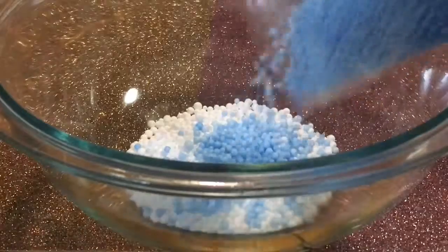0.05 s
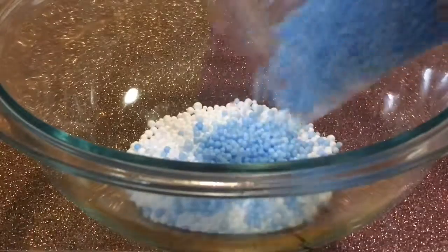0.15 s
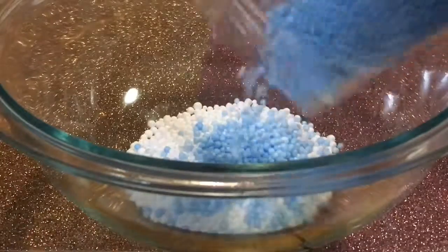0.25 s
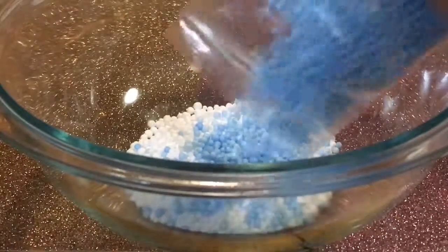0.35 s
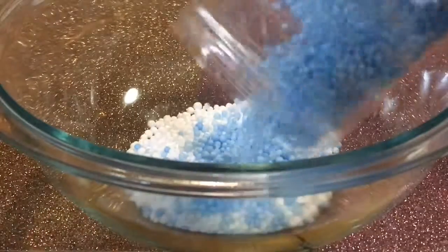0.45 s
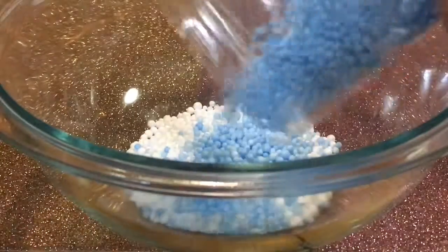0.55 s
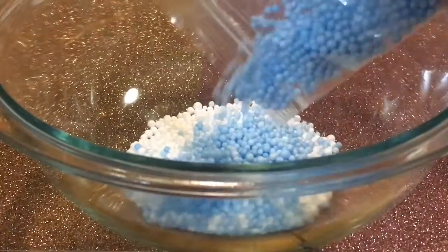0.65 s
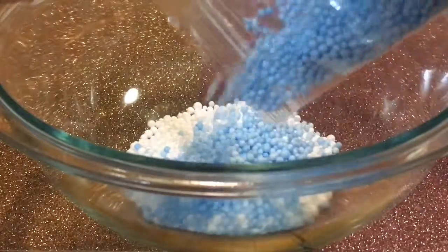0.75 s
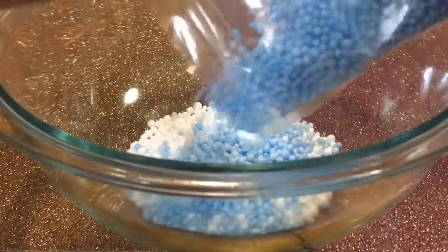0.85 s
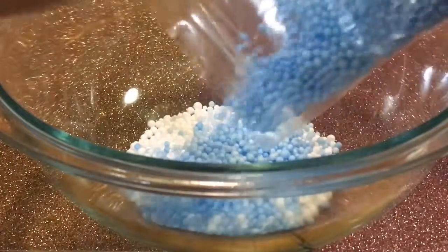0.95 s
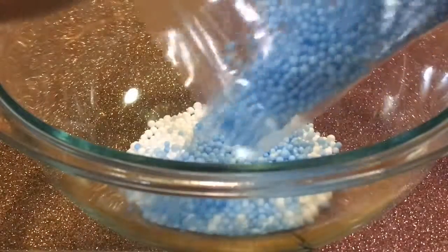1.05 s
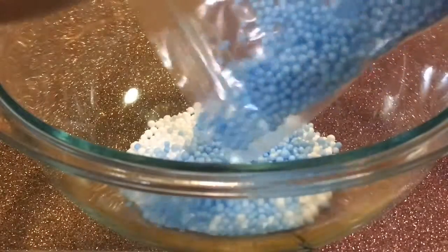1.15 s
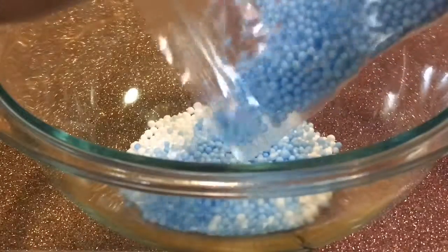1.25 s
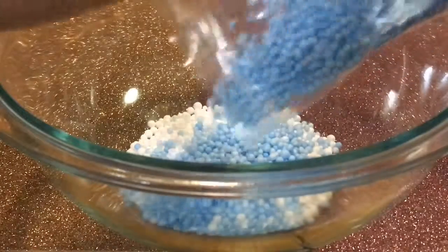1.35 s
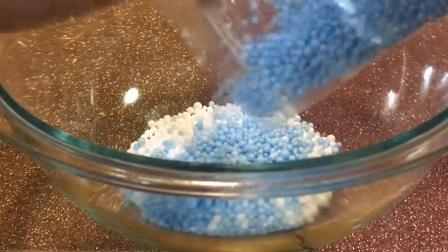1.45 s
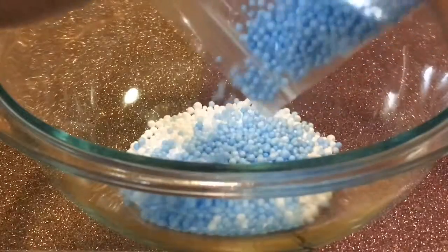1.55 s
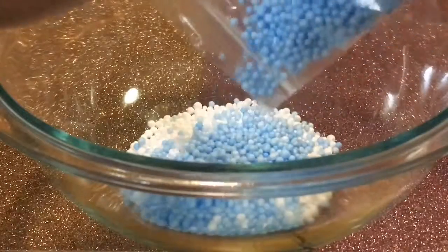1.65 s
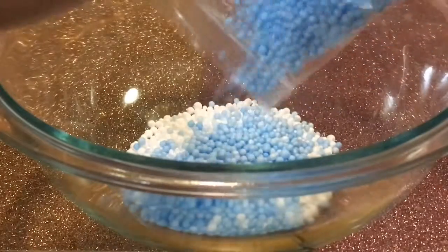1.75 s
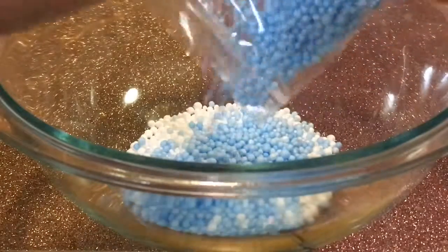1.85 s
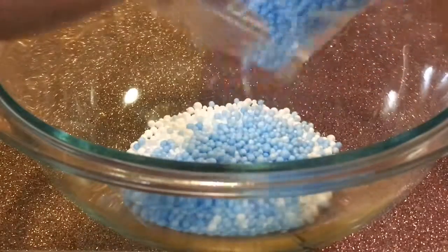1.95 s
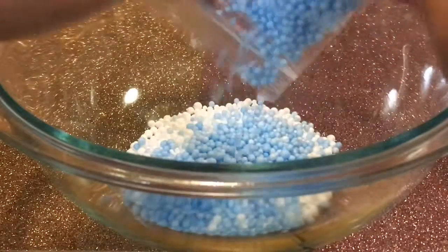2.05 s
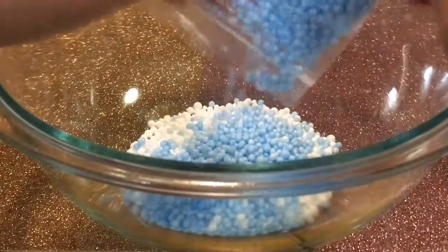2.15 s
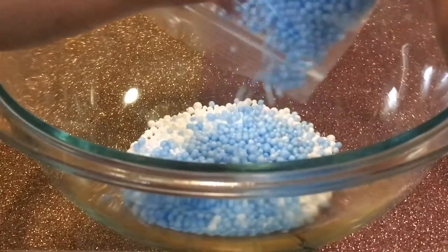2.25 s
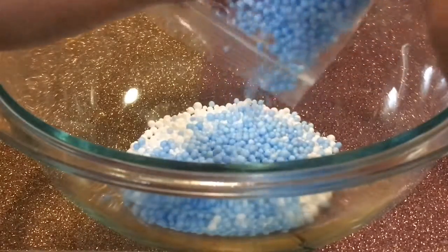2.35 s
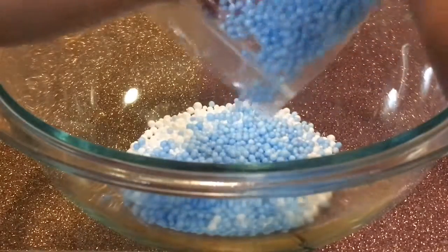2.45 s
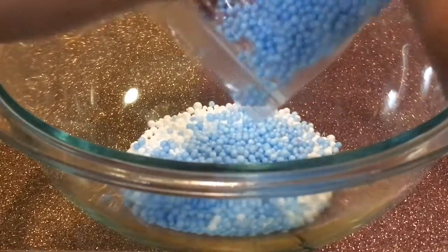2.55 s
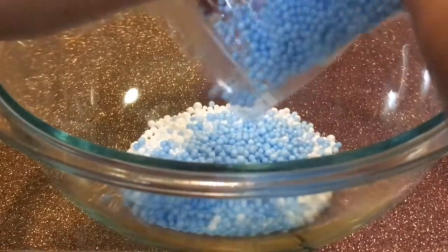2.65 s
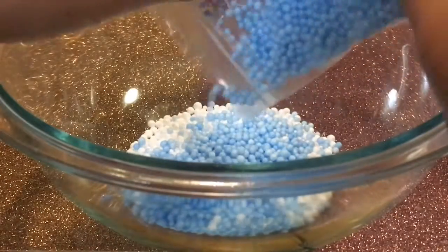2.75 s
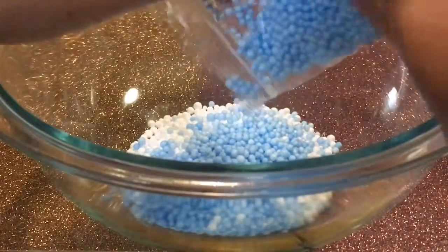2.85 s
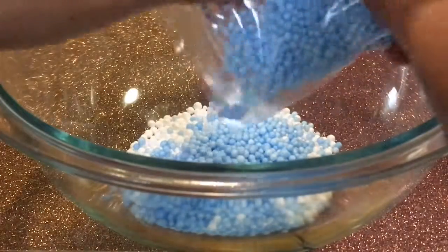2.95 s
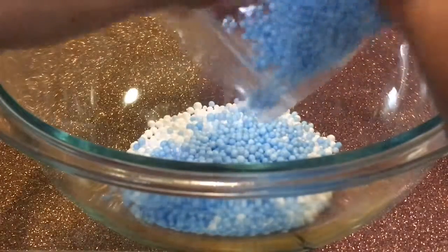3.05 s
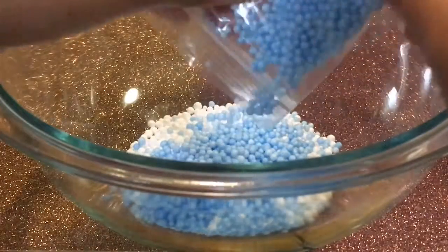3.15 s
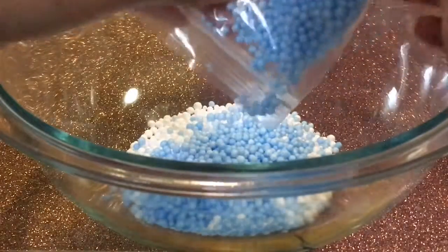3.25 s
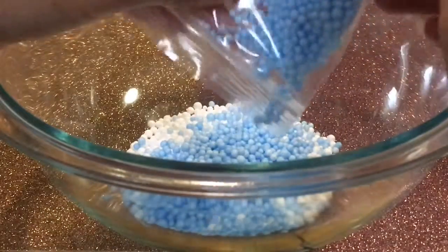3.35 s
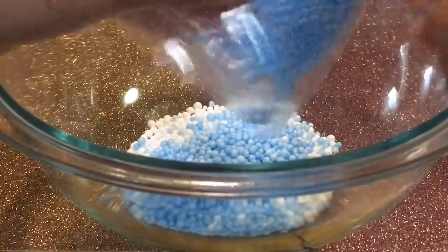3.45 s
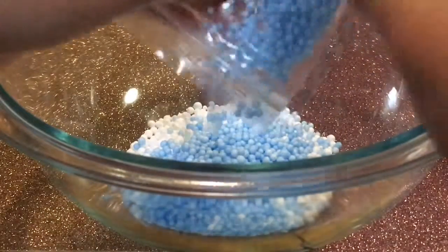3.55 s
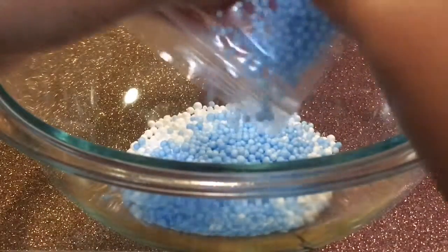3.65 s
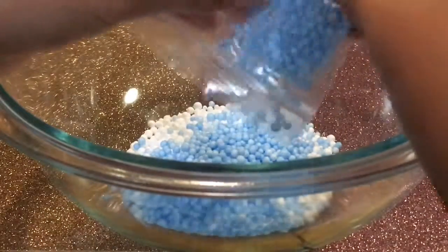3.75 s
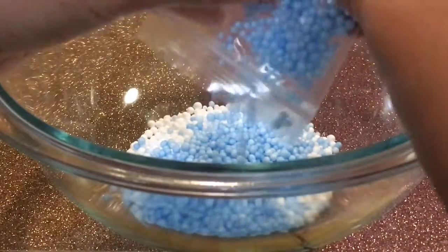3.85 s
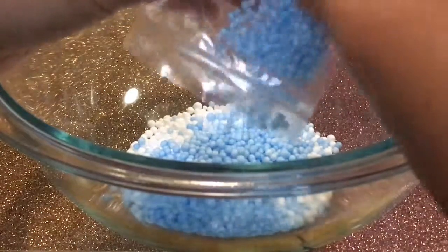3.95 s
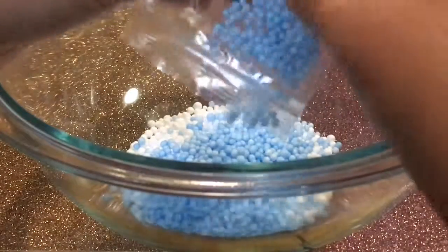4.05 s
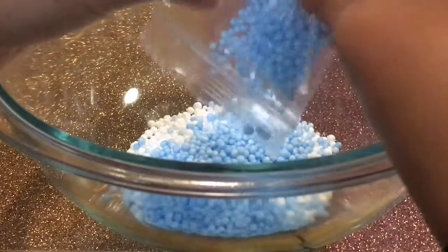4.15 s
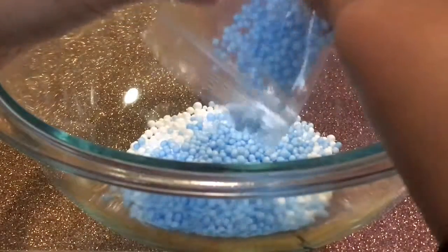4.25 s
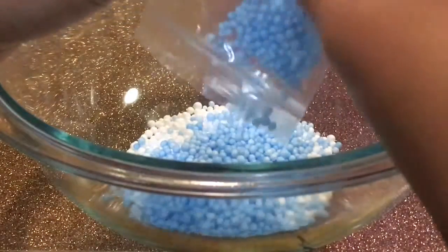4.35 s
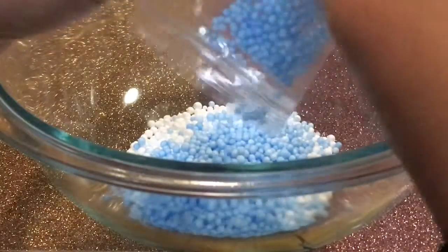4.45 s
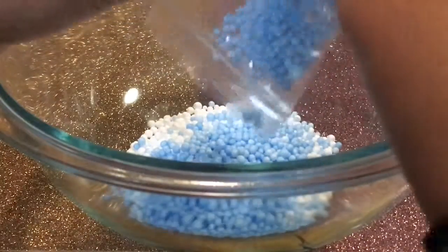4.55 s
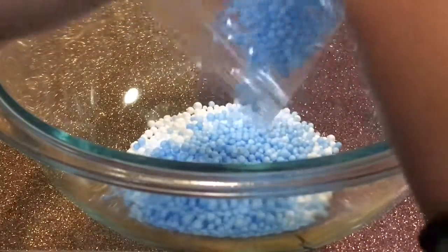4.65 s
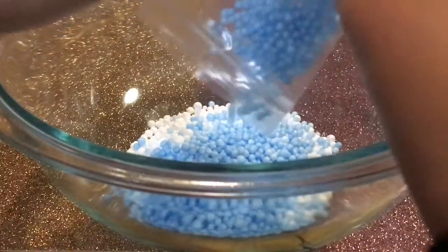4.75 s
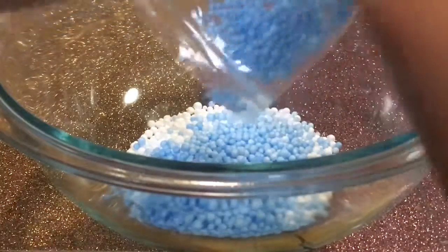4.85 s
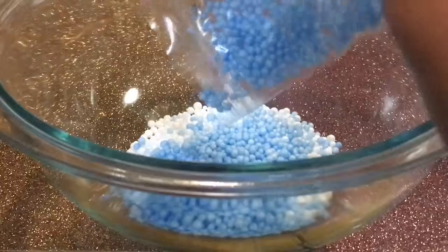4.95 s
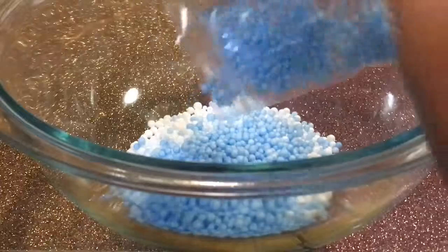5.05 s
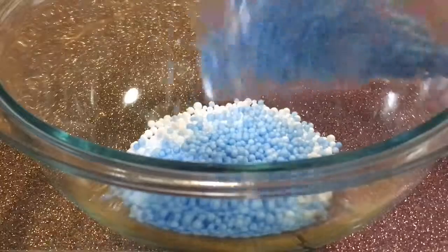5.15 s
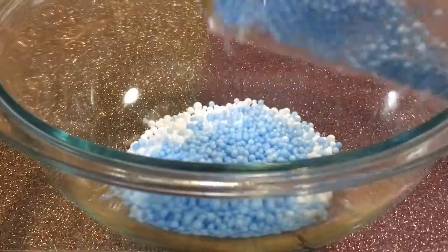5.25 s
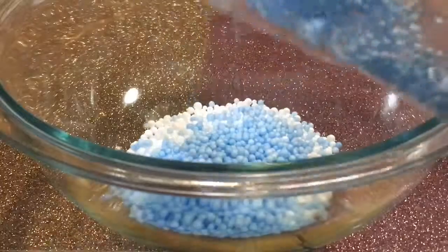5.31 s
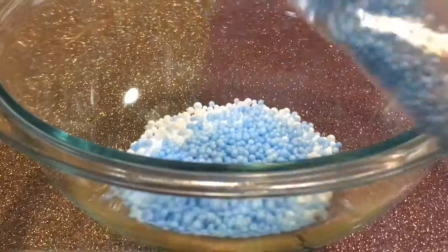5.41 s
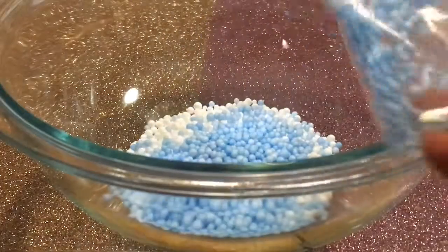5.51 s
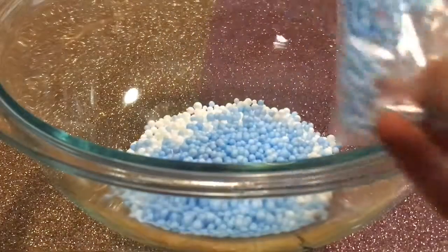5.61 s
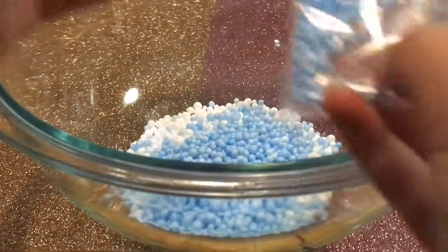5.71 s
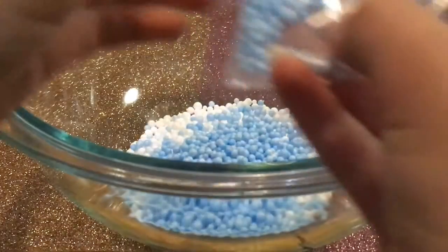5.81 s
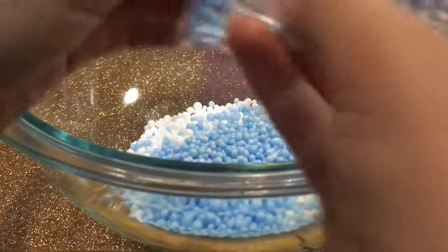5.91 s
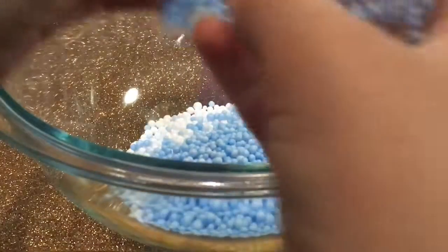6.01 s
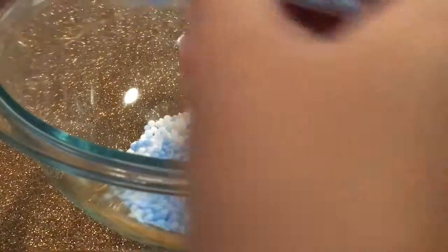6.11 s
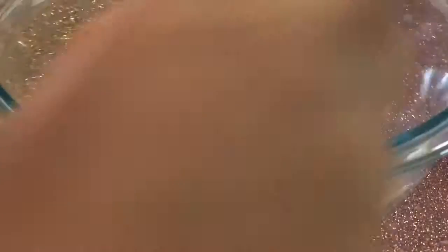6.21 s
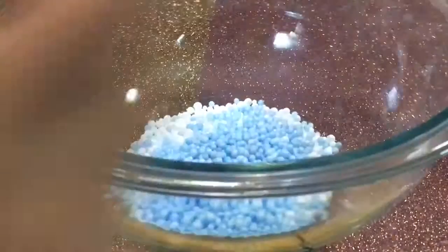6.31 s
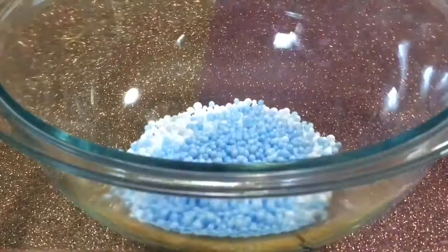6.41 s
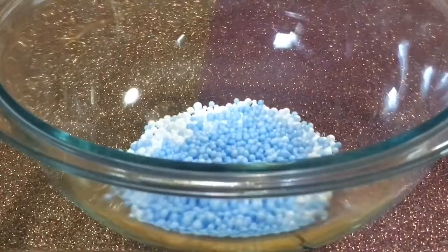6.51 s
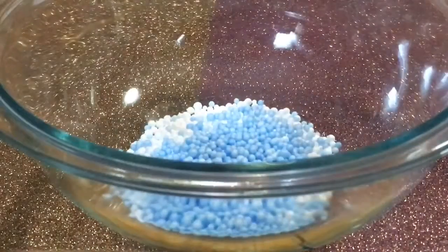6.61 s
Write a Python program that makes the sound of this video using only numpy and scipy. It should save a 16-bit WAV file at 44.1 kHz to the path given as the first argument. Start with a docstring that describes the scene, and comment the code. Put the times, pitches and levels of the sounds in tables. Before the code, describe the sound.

Very close, light foam beads patter and hiss out of a thin plastic bag into a glass bowl. Soon the film crinkles in quick, uneven squeezes with crisp snaps and small hollow pops, densest through the middle. It drops to a lull, one last short crumple bursts out, then it nearly stops. A faint low hum lies beneath in a small room.

```python
"""Foam beads are shaken and squeezed out of a thin plastic bag into a glass bowl, close to the microphone.
From the start beads patter and slide (ringing and plain random clicks) over a low hum and soft flopping.
Soon creases snap (treble-first clicks), stiff patches pop (decaying sines), and squeezes crumple the film
(swarms of tiny buckles), densely until a lull after 5.3 s; a last burst near 6 s dies down.
Resonances of the bowl and reflections from glass, table and a small room colour the bag and beads."""
import sys
import numpy as np
from scipy import signal
from scipy.fft import rfft, irfft
from scipy.io import wavfile
from scipy.ndimage import uniform_filter1d

SR = 44100
rng = np.random.default_rng(int(sys.argv[2]) if len(sys.argv) > 2 else 0)


def inscribe(sig):
    """Save sig as 16-bit PCM at rate SR to the path in sys.argv[1].

    A 1-D sig is mono; a 2-D sig holds one channel per row.
    Samples are clipped to [-1, 1] before scaling.
    """
    pcm = np.round(np.clip(np.atleast_2d(sig).T, -1, 1) * 32767)
    wavfile.write(sys.argv[1], SR, pcm.astype(np.int16))


N = 294279
TIME = np.arange(N) / SR

# squeezes and shakes of the bag: start_s [s], level_db [dB, relative], rise_s [s], fade_t60_s [s to -60 dB]
SQUEEZES = [(0.456, -31.5, 0.013, 0.15), (0.682, -28, 0.005, 0.07), (0.832, -18.5, 0.0077, 0.087),
            (1.449, -21.5, 0.03, 0.052), (1.503, -17.5, 0.015, 0.11), (1.778, -19, 0.017, 0.08),
            (1.8, -19.5, 0.016, 0.1), (1.938, -26, 0.028, 0.06), (2.091, -24, 0.0086, 0.13),
            (2.558, -27.5, 0.011, 0.11), (2.657, -16.5, 0.0086, 0.13), (2.796, -28.5, 0.02, 0.09),
            (2.913, -16, 0.011, 0.14), (2.944, -20, 0.02, 0.12), (3.049, -22.5, 0.055, 0.17),
            (3.179, -26.5, 0.0045, 0.042), (3.287, -25, 0.044, 0.18), (3.474, -21, 0.02, 0.15),
            (3.51, -22.5, 0.025, 0.29), (3.743, -16, 0.032, 0.27), (3.914, -19, 0.034, 0.32),
            (4.116, -25, 0.0087, 0.2), (4.158, -23, 0.023, 0.24), (4.315, -19.5, 0.035, 0.22),
            (4.504, -14, 0.017, 0.1), (4.532, -20, 0.048, 0.14), (4.728, -22, 0.0074, 0.32),
            (5.054, -24.5, 0.041, 0.43), (5.253, -27, 0.002, 0.034), (5.63, -38.5, 0.06, 0.45),
            (5.936, -32, 0.007, 0.14), (5.984, -17.5, 0.021, 0.13), (6.26, -42.5, 0.035, 0.3)]
# spectrum of the plastic film: frequency_hz [Hz], level_db [dB per Hz, relative]
FILM_COLOUR = [(60, -10.5), (190, 0), (450, -6.5), (800, -6.5), (1600, -6), (2450, -3), (3500, -0.5),
               (4400, -1.5), (4850, -2.5), (5600, 1.5), (6600, 1.5), (7700, -2), (9000, -3), (16000, -3)]


def undb(db):
    """Decibels to gain."""
    return 10 ** (np.asarray(db) / 20)


def unit(x):
    """Scale to rms 1."""
    return x / np.sqrt(np.mean(x ** 2) + 1e-18)


def curve(table):
    """Join the rows of a table by straight lines."""
    return np.interp(TIME, *np.transpose(table))


def walk(rate):
    """Slow chance at rms 1: random levels, a new one each 1 / rate s, joined by ramps."""
    hold = int(SR / rate)
    steps = np.repeat(rng.standard_normal(N // hold + 1), hold)
    return unit(uniform_filter1d(steps, hold)[:N])


def colour(x, points, size=2048):
    """Causal (minimum-phase) filter of unit energy through (Hz, dB) points."""
    hz, db = np.transpose(points)
    bins_hz = np.arange(size // 2 + 1) * SR / size
    log_gain = np.log(undb(np.interp(np.log(bins_hz + 1), np.log(hz), db)))
    # folding the cepstrum forward puts the energy as early as possible
    cepstrum = irfft(log_gain)
    cepstrum[1:size // 2] *= 2
    cepstrum[size // 2 + 1:] = 0
    response = irfft(np.exp(rfft(cepstrum)))
    return signal.fftconvolve(x, response / np.linalg.norm(response))[:len(x)]


def tilt(x, slope_db, low_hz=1200, high_hz=11000):
    """Brighten or dull a sound by so many dB per octave between two frequencies."""
    hz = np.clip(np.arange(len(x) // 2 + 1) * SR / len(x), low_hz, high_hz)
    return irfft(rfft(x) * undb(slope_db * np.log2(hz / low_hz)), len(x))


def resonate(x, hz, width):
    """One resonance, gain 1 at its centre."""
    return signal.lfilter(*signal.iirpeak(hz, hz / width, fs=SR), x)


def clicks(rate, spread_db, size):
    """Random impulses at a rate per second, many small and a few large."""
    strength = undb(spread_db * np.minimum(rng.exponential(size=size), 4))
    return (rng.random(size) < rate / SR) * strength * rng.choice([-1, 1], size)


def add(track, start, sound):
    """Mix a sound in at a time."""
    i = max(int(start * SR), 0)
    track[i:i + len(sound)] += sound[:N - i]


def panel(x, boost=0.61):
    """Every patch of film has a size, and so a broad resonance, of its own."""
    hz = rng.uniform(2500, 13000)
    return x + boost * resonate(x, hz, hz / 4)


def effort(db, rise, fade):
    """One squeeze: the fingers tighten, hold a moment and ease off."""
    hold_s = 0.0093
    t = TIME[:SR // 2]
    tighten = np.minimum(t / max(rise, 1 / SR), 1)
    ease = np.exp(-np.log(1000) * np.maximum(t - rise - hold_s, 0) / fade)
    return undb(db) * tighten * ease


def background():
    """A low hum, wavering in level and phase, over the rumble and hiss of the room."""
    # spectrum of the quiet room: frequency_hz [Hz], level_db [dB per Hz, relative]
    room_colour = [(20, -34.5), (42, -11.5), (64, -2.5), (100, -9), (145, -17), (200, -18), (480, -25),
                   (900, -29), (3400, -26.5), (5000, -50), (16000, -55)]
    hum_hz, hum_db = 57.2, -49.5
    waver = undb(walk(4.2))
    hum = unit(np.sin(2 * np.pi * hum_hz * TIME + 0.14 * walk(4))) * waver * undb(hum_db)
    return hum + undb(-50.0) * unit(colour(rng.standard_normal(N), room_colour))


def bead_flow():
    """Level of the sliding beads in dB: they stall as the hand draws back before each squeeze."""
    # beads sliding down the bag and onto the heap: time_s [s], level_db [dB, relative]
    flow = [(0.0, -37.5), (0.19, -38.5), (0.48, -29.5), (0.57, -36), (0.89, -33.5), (1.0, -39.5),
            (1.4, -37.5), (1.68, -40), (1.88, -35.5), (2.2, -31.5), (2.44, -39), (2.6, -45), (2.9, -39),
            (3.27, -44.5), (4.45, -41.5), (4.65, -38), (5.2, -43), (5.35, -46.5), (5.9, -43.5), (6.08, -33),
            (6.45, -51.5), (6.67, -54)]
    lead_s, width_s, dip_db = 0.041, 0.031, -1.5
    stalls = [np.exp(-np.abs((TIME - start + lead_s) / width_s) ** 2) for start, *_ in SQUEEZES]
    return curve(flow) + dip_db * np.max(stalls, axis=0)


def beads(flow_db, treble_hz=7000):
    """Light beads tick against each other, ringing briefly at eight pitches, over the hiss of sliding."""
    # spectrum of the beads: frequency_hz [Hz], level_db [dB per Hz, relative]
    bead_colour = [(100, -11), (300, -6), (550, -13), (800, -8.5), (1700, -7.5), (2500, -5), (3200, -0.5),
                   (4400, -1), (4900, -5), (5600, 1), (6900, -1.5), (7700, -5.5), (12000, -3), (16000, -2)]
    # boost of the beads' treble: time_s [s], boost_db [dB]
    treble_boost = [(0, 4.5), (0.75, -0.5), (2.6, 4), (5.3, 3), (6.05, -7), (6.67, 0)]
    pitches = np.geomspace(1500, 13000, 8)
    ticks = sum(resonate(clicks(200, 3.4, N), hz, hz * 0.26) * (1500 / hz) ** 0.25 for hz in pitches)
    sliding = clicks(7000, 2.6, N)
    clumps = undb(2.06 * walk(140))  # beads let go in little avalanches
    mixture = unit(ticks) + undb(2.0) * unit(sliding)
    rattle = colour(unit(mixture * clumps), bead_colour)
    highpass = signal.butter(2, treble_hz, "high", fs=SR, output="sos")
    treble = signal.sosfiltfilt(highpass, rattle)
    return (rattle + (undb(curve(treble_boost)) - 1) * treble) * undb(flow_db)


def flexing(flow_db):
    """Wide panels of the bag flop softly and push a little air, with squeezes and under moving beads."""
    flex_db, flex_law = -35, 0.65  # level at an effort of 1, and power law of its growth with effort
    sag_db = -18.5  # flopping relative to the bead level
    grip = np.zeros(N)
    for start, db, rise, fade in SQUEEZES:
        add(grip, start, effort(db, rise, fade))
    flops = resonate(resonate(clicks(250, 4.5, N), 81, 143), 122, 220)
    return unit(flops) * (undb(flex_db) * grip ** flex_law + undb(flow_db + sag_db))


def random_creases(flow_db):
    """Creases let go at random as beads shift, louder with the flow: rows like those of the timed snaps."""
    per_s, over_beads_db, spread_db = 10, 8, 0.5
    bright_db, bright_spread_db = 2.5, 6.5  # dB per octave
    draws = rng.random((int(per_s * N / SR), 3))
    at = (draws[:, 0] * (N - 1)).astype(int)
    db = flow_db[at] + over_beads_db + spread_db * (2 * draws[:, 1] - 1)
    brightness = bright_db + bright_spread_db * (2 * draws[:, 2] - 1)
    return list(zip(TIME[at], db, brightness))


def snaps(creases, spread_s=.0014, flutter_s=0.0034, flutter_db=-5):
    """A crease flips: its click travels the film as a bending wave, treble first, and the film flutters."""
    out = np.zeros(N)
    t = TIME[:2048]
    hz = np.arange(len(t) // 2 + 1) * SR / len(t)
    for start, db, bright_db in creases:
        travel_s = spread_s * rng.uniform(0.6933, 1.4)  # delay at 1.5 kHz; higher frequencies arrive sooner
        crack = irfft(np.exp(-4j * np.pi * travel_s * np.sqrt(3000 * (hz + 1500))))
        flutter = rng.standard_normal(len(t)) * np.exp(-t / flutter_s) * np.minimum(t / travel_s, 1)
        flip = crack + undb(flutter_db) * flutter / np.linalg.norm(flutter)
        sound = tilt(panel(flip, boost=0.9), bright_db, low_hz=2000)
        sound /= np.sqrt(np.mean(sound[:SR // 500] ** 2))  # rms 1 over the first 2 ms
        add(out, start - travel_s / 3, sound * undb(db))  # begun early to allow for travel
    return colour(out, FILM_COLOUR) * undb(2.0)


def pops(cycles=1.47):
    """A stiff patch flips over and rings for a cycle or two: hollow pops if small, soft thumps if wide."""
    # patches of the bag flipping over: start_s [s], level_db [dB before the lift below], pitch_hz [Hz]
    patches = [(0.13, -28.5, 1950), (.399, -36, 114), (.668, -36, 95.5), (.843, -35, 169),
               (1.292, -24.5, 1060), (1.513, -14, 1340), (1.79, -36, 181), (2.5327, -20, 1370),
               (2.667, -29.5, 155), (2.957, -31, 192), (3.079, -21, 1070), (3.4147, -26, 1300),
               (4.126, -22, 1000), (4.4574, -21, 1330), (5.137, -21.5, 1320), (5.252, -27, 620),
               (5.523, -36, 900), (6.014, -26, 720)]
    lift_db = 5.5
    out = np.zeros(N)
    t = TIME[:SR // 15]
    for start, db, hz in patches:
        ring = np.sin(2 * np.pi * hz * t) * np.exp(-t * hz / cycles)
        add(out, start, ring * undb(db + lift_db))
    return out


def crumples():
    """Each squeeze sets off a swarm of tiny buckles, the brighter the harder it is."""
    pivot_db, bright_per_db = -22.5, 0.03  # dB per octave of brightness for each dB above the pivot
    out = np.zeros(N)
    for start, db, rise, fade in SQUEEZES:
        press = effort(db, rise, fade)
        buckles = panel(clicks(8000, 4.35, len(press)))
        swarm = unit(tilt(buckles, bright_per_db * (db - pivot_db)))
        add(out, start, swarm * press)
    jerks = undb(2.34 * walk(200))  # the film gives way unevenly
    return colour(out * jerks, FILM_COLOUR) * undb(-1.12)


def bowl(x):
    """The bowl and the air in it resonate in proportion to how far the bag is inside."""
    # resonances of the bowl and its air: pitch_hz [Hz], width_hz [Hz], boost_db [dB, bag fully inside]
    resonances = [(1098, 116, 6), (1232, 183, 7.5), (1368, 77, 8), (1930, 240, 6), (2133, 81, 9),
                  (2756, 180, 6), (7200, 33, -8)]
    # how far the bag is inside the bowl: time_s [s], share [0-1]
    bag_depth = [(0, 0.66), (1.4, 0.73), (5.2, 0.92), (5.35, 0.6)]
    inside = np.clip(curve(bag_depth), 0, 1)
    return x + sum((undb(db) - 1) * resonate(x * inside, hz, width) for hz, width, db in resonances)


def room(x, near_t60=0.016, near_db=-10, far_t60=0.3, far_db=-17, dull_hz=6000, count=6):
    """Quick reflections from glass and table that change as the bag moves, then a small room's duller tail."""
    t = TIME[:SR // 2]
    place = np.clip(count / 2 + count / 4 * walk(5), 0, count - 1)  # wanders among echo patterns
    lowpass = signal.butter(1, dull_hz, fs=SR, output="sos")
    decays = np.exp(-np.log(1000) * t / np.array([[near_t60], [far_t60]]))
    out = x
    for spot in range(count):
        near, far = rng.standard_normal((2, len(t))) * decays
        far = signal.sosfilt(lowpass, far)
        echoes = undb(near_db) * near / np.linalg.norm(near) + undb(far_db) * far / np.linalg.norm(far)
        share = np.sqrt(np.maximum(1 - np.abs(place - spot), 0))  # equal-power crossfade
        out = out + signal.oaconvolve(x * share, echoes)[:N]
    return out


def scene():
    """Bag and beads over the bowl, in the room."""
    # single creases at set times, from loud to very faint: start_s [s],
    # level_db [dB over the first 2 ms, before film colour and gain], brightness_db [dB per octave]
    timed_creases = [(0.128, -33, -5), (0.447, -26, -4), (0.6382, -24, 1), (0.8394, -4.5, 17.5),
                     (0.844, -22, 0), (1.083, -17, 2), (1.2959, -28, -1.5), (1.506, -11.5, 2),
                     (1.5809, -13, 1), (1.7025, -29, -3), (1.7619, -24.5, -4), (1.7842, -18, -2),
                     (2.0216, -18.5, 8), (2.036, -6, 5), (2.0727, -27, -3.5), (2.1068, -17, 7),
                     (2.1128, -10.5, 5.5), (2.1374, -9.5, 2.5), (2.2178, -17.5, 7), (2.2297, -26, -4),
                     (2.385, -37, -15), (2.4993, -28.5, -1.5), (2.5638, -24, 3), (2.5732, -20, -0.5),
                     (2.722, -17, 3), (2.727, -14.5, 0), (2.9262, -16, 6), (2.9507, -14, 14),
                     (2.9685, -21, -3.5), (2.9836, -11.5, 2), (3.0808, -19.5, -2), (3.0995, -11.5, 3.5),
                     (3.3092, -15, 2.5), (3.3276, -10, 3.5), (3.3853, -23.5, -1.5), (3.4159, -26, -5),
                     (3.5014, -24, -3), (3.769, -23.5, -2), (3.8516, -14, 3.5), (4.0255, -21.5, -3),
                     (4.1274, -19.5, -0.5), (4.1973, -19, 4), (4.355, -16, 15), (4.4566, -19, 3.5),
                     (4.5491, -13.5, 5), (4.571, -13, 11), (4.622, -11.5, 5.5), (4.8092, -21.5, 5),
                     (5.023, -20, -0.5), (5.052, -10, 3), (5.072, -23, -7), (5.1605, -28.5, 4),
                     (5.2521, -16.5, 0.5), (5.523, -39.5, -7), (5.6547, -32.5, -6.5), (5.7693, -30, -0.5),
                     (5.847, -40, -1), (5.926, -37, -4), (5.9476, -14, 1.5), (5.962, -25, -1),
                     (6.011, -11, 0.5), (6.0142, -13, -1.5), (6.143, -38, -5), (6.1867, -35, 9),
                     (6.377, -42, -2)]
    flow_db = bead_flow()
    crackle = beads(flow_db) + crumples() + snaps(timed_creases) + snaps(random_creases(flow_db))
    pouring = bowl(crackle) + pops() + flexing(flow_db)
    return (undb(-0.52) * room(pouring) + background())[None]


def record(dry):
    """Peaks are clipped at full scale, then a steep low-pass cuts the top."""
    top_hz = 15900
    lowpass = signal.ellip(10, .1, 70, top_hz, fs=SR, output="sos")
    return signal.sosfilt(lowpass, np.clip(dry, -1, 1))


dry = scene()
out = record(dry)
inscribe(out)
```